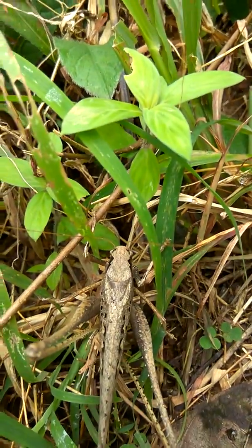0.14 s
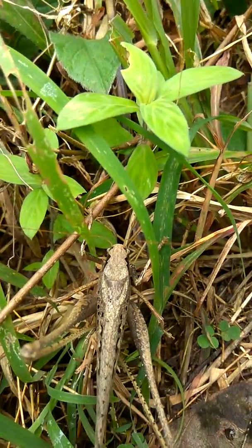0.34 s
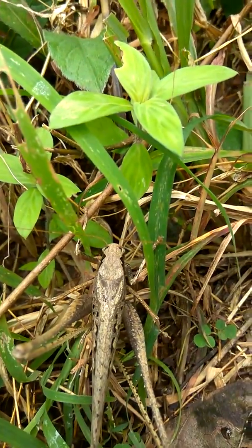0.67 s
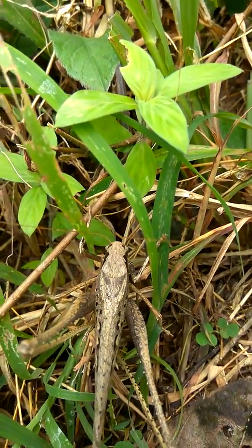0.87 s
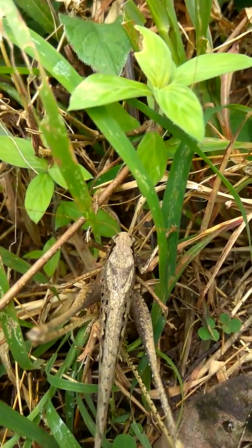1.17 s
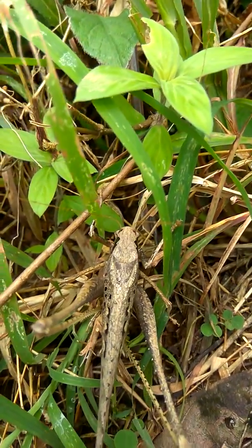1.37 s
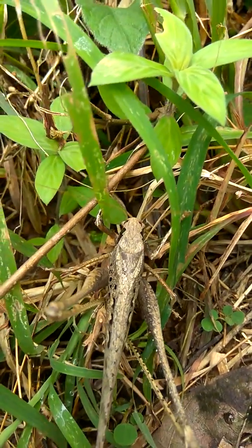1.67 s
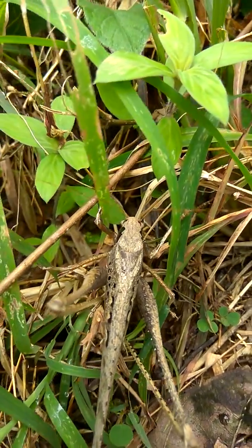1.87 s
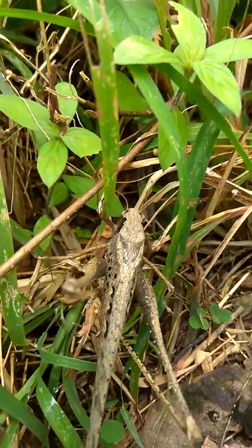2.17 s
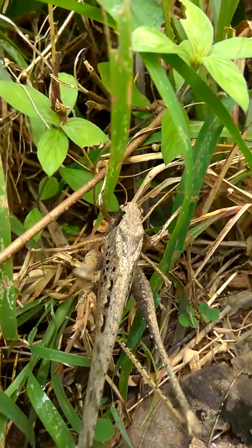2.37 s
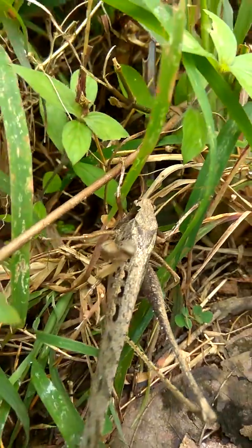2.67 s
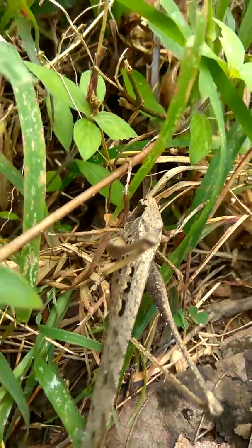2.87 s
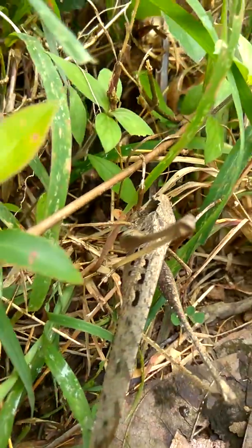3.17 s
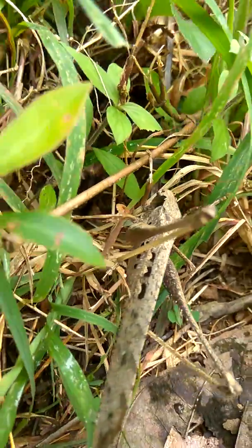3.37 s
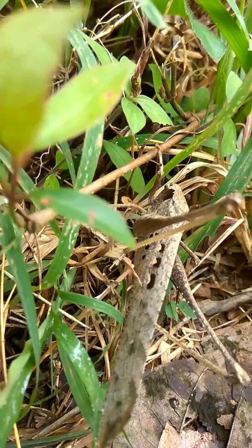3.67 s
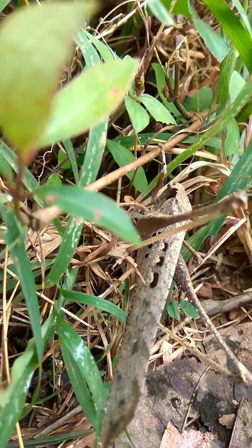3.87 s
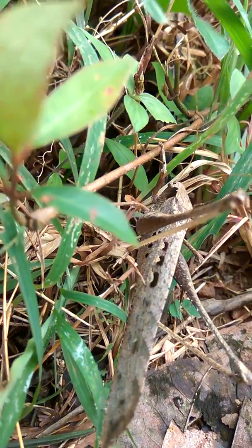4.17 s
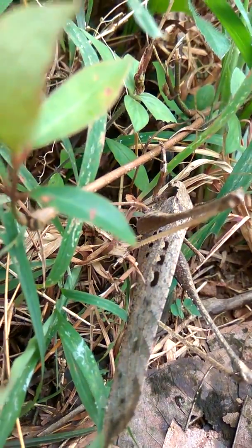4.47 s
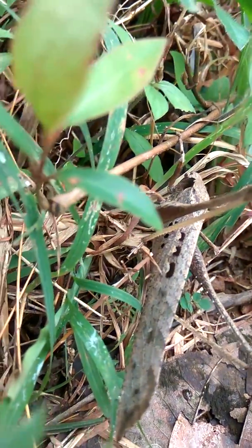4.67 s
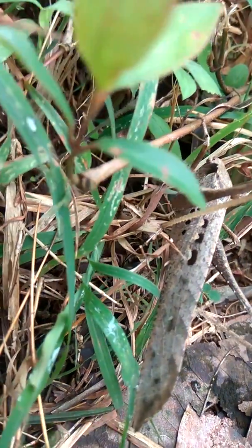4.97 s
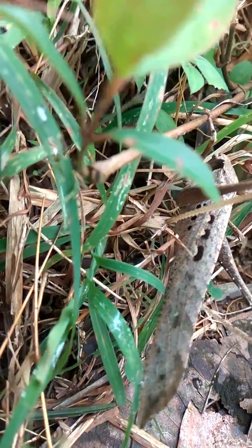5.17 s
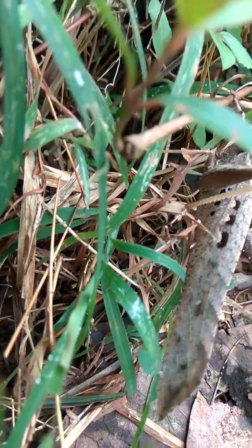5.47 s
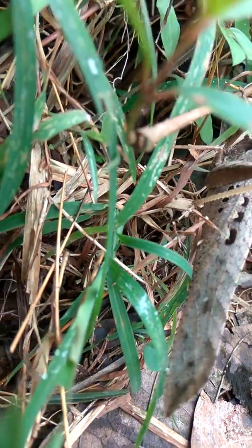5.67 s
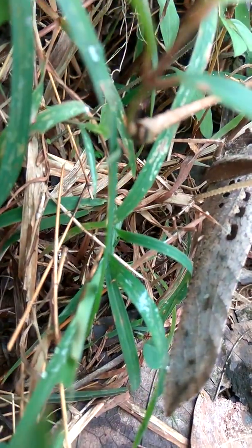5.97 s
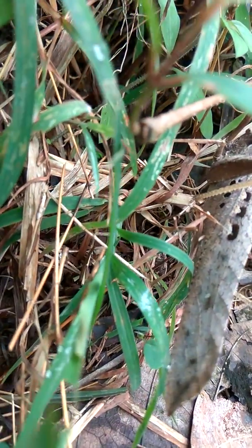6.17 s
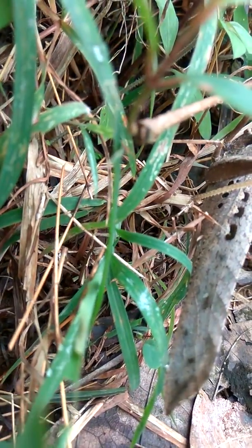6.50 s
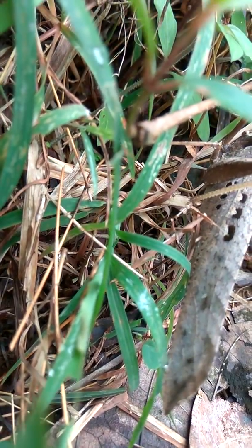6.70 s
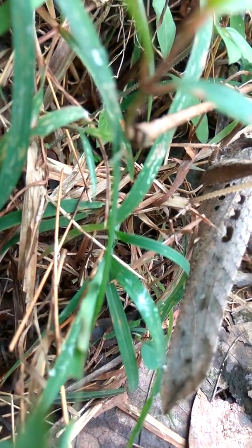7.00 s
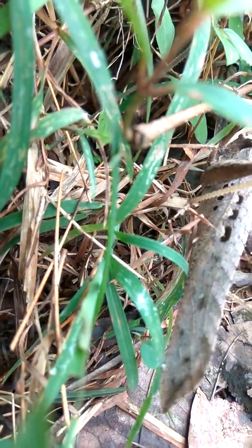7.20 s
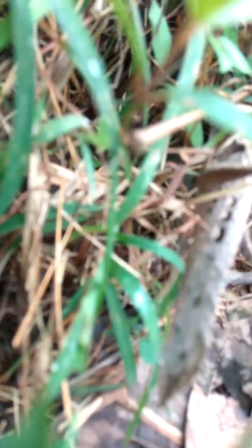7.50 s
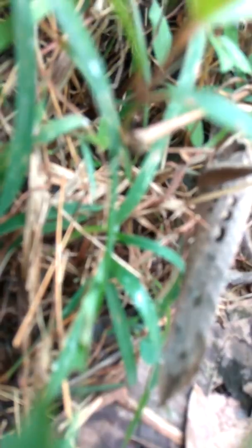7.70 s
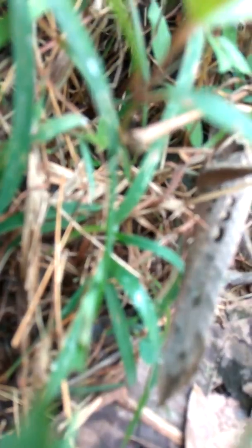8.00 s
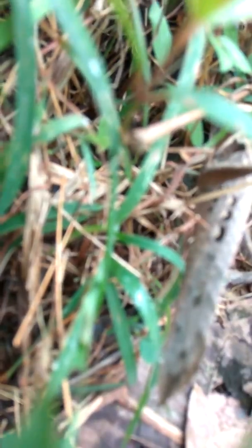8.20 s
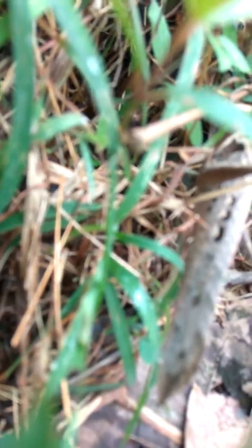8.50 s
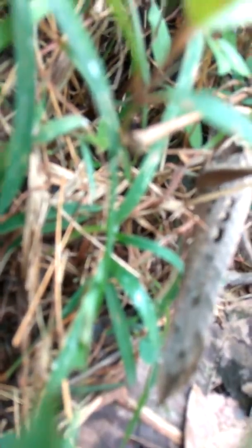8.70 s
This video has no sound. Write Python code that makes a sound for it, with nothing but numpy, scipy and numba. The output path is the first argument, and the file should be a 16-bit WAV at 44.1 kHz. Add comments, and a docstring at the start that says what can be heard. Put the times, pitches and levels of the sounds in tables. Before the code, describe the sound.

A small bird calls repeatedly outdoors over a faint low rumble, then dry grass and leaves scrape, crackle and snap loudly against the left microphone.

```python
"""A small bird is already calling in the bushes, over a low far rumble and faint wavering insect tones.
A few lone snaps follow, and the bird begins a run of falling two-part calls (gliding sines with a noise wash).
A phone is then pushed through dry grass: stalks and dead leaves scrape and snap on its left microphone as
noise bursts ringing resonators; the right one hears softer leaves. The loudest snaps overload the recorder."""
import sys
import numpy as np
from scipy import signal
from scipy.fft import rfft, irfft, next_fast_len
from scipy.io import wavfile
from scipy.ndimage import uniform_filter1d
from numba import njit

SR = 44100
rng = np.random.default_rng(int(sys.argv[2]) if len(sys.argv) > 2 else 0)


def wav_record(signal):
    """Record a signal, one row per channel, as 16-bit PCM in the file named by sys.argv[1]."""
    frames = np.transpose(np.atleast_2d(signal))
    bounded = np.clip(frames, -1, 1)
    # unit amplitude maps onto the largest positive 16-bit level
    quanta = np.round(bounded * 32767).astype(np.int16)
    wavfile.write(sys.argv[1], SR, quanta)


def rack_gain(trim_db):
    """Turn a fader trim in dB into the linear factor to multiply a signal by."""
    fader = np.asarray(trim_db, float)
    return 10 ** (fader / 20)


N = 390285  # length in samples
TIME = np.arange(N) / SR  # s

# All table levels are relative; the functions add their own gains.
# Stalks snapping at the left port:
# (time [s], middle level [dB], body above middle [dB], edge above middle [dB])
NEAR_SNAPS = [(1.1478, -70.5, 18.5, 24), (1.2845, -67.5, 19.5, 30.5), (1.4955, -60.5, 14, 24),
              (1.7629, -51.5, 11, 22), (2.3629, -59.5, 20, 26.5), (2.968, -44, 12.5, -3),
              (3.024, -35, 9.5, 2.5), (3.1203, -32, 9, 0), (3.1867, -37.5, 19, 4.5),
              (3.2385, -41.5, 25.5, 14), (3.2905, -22, 1, -3), (3.3034, -14, -4, 2.5),
              (3.3508, -7.5, -7, -5), (3.3802, -9, -22, 2.5), (3.3902, -13, -14, -13),
              (3.4047, -6, -19, -8.5), (3.4346, -15, -21, -8), (3.475, -27, 1.5, 16.5),
              (3.5075, -18, -19, -4), (3.5279, -14, -7.5, 3), (3.5728, -24.5, -1, 14.5),
              (3.6183, -21, -6, 5), (3.6351, -7, -13, 1), (3.6677, -28, -26, -9), (3.7005, -17, 6, 6.5),
              (3.71, -18, 6, 10.5), (3.7219, -9, -27, -1.5), (3.7299, -15, -6, 3), (3.7435, -14, -4, 0),
              (3.7529, -34, -25, 19), (3.7714, -23.5, -15, 11.5), (3.797, -39, -25, -11),
              (3.8187, -10, -8, -2.5), (3.8245, -14, -6, 3), (3.8945, -36.5, 0, 14.5),
              (3.9195, -20.5, -8, -15), (4.0858, -28.5, -1, -7), (4.1011, -16, -10, -0.5),
              (4.126, -16, -18, -10), (4.147, -17.5, -20, -5), (4.174, -26.5, -2.5, 3),
              (4.2036, -19.5, -13, 1), (4.3146, -31.5, 10, 14.5), (4.328, -27.5, -20, 16),
              (4.3929, -28, -7, 12.5), (4.405, -24, -5, 13.5), (4.4228, -19, -10, 5.5),
              (4.4348, -26.5, -15, 19), (4.5074, -31, -5, 2.5), (4.5695, -24, -12, 9.5),
              (4.645, -26, -9, 4), (4.7147, -15.5, -5, -2), (4.7391, -7.5, -17, -31),
              (4.793, -7.5, -11.5, -36), (4.803, -16, -12, -9), (4.862, -16, -15, -19),
              (4.8808, -7.5, -13, -34), (4.9816, -36, 0, 20.5), (4.9945, -28, 8.5, 14),
              (5.0464, -35.5, 11, 22), (5.0925, -34, -9, 8), (5.1205, -31, -1, 7), (5.1342, -28, 11, 8),
              (5.1692, -32.5, 10, 8), (5.1751, -17.5, 11, 12), (5.2001, -22.5, 4.5, 8.5),
              (5.2515, -21, 3.5, 3), (5.3073, -35, 18.5, 17.5), (5.3527, -20.5, 8.5, 4),
              (5.3752, -23, 6.5, 5.5), (5.3971, -26.5, 2, 10.5), (5.4335, -27.5, -10, 5.5),
              (5.4665, -46, -15, 25.5), (5.4864, -33.5, -2, 11.5), (5.5214, -28, -2, 5),
              (5.5303, -23, -0.5, 5), (5.5405, -29, -8, 3), (5.604, -23, -22, -19), (5.62, -25.5, -1, -13),
              (5.7009, -22, -6, 6.5), (5.7773, -27, -4, 11.5), (5.8296, -33, -2, 13),
              (5.8366, -14.5, -17, -24), (5.8476, -35.5, -10, 19), (5.855, -29.5, -12, 12.5),
              (5.9678, -31.5, 4, 11), (5.9938, -14, -14.5, 4), (6.0691, -20, -12, 2.5),
              (6.129, -16.5, -10, 3), (6.1414, -6.5, -9, -10), (6.1509, -13, -2.5, 0),
              (6.1699, -16, -29, -20), (6.1923, -13.5, -17, -3.5), (6.1993, -14.5, -5, -3),
              (6.2238, -24, 0, -2), (6.2355, -24.5, 2.5, -3), (6.334, -34.5, 8, -11), (6.4971, -21, 2, 2.5),
              (6.728, -34.5, -3, -7), (6.7501, -16.5, -0.5, 1), (6.787, -30, -11, -21),
              (6.8, -33.5, 1, -21), (6.8225, -32, -6, -23), (6.841, -34, -3, -21), (6.855, -29, -4, -14),
              (6.882, -31, -8, -22), (6.9057, -19.5, -1.5, -11.5), (6.929, -44, -8, -17),
              (6.9586, -16, -20, -12), (6.974, -38, 7, -6), (6.997, -28.5, -5, -13), (7.0374, -32, -11, -2),
              (7.1392, -30, 1, -5.5), (7.2454, -34.5, -7, -24), (7.3253, -37, -20, -23),
              (7.3603, -41, -15, -6), (7.3716, -36.5, 0, -13), (7.408, -49, 12.5, -18), (7.447, -41, 1, -7),
              (7.485, -44.5, 6.5, 13), (7.5667, -56, 15, 21), (7.645, -60.5, -17, 28),
              (7.7119, -30.5, -7.5, -45), (7.766, -38.5, 5, -34), (7.8636, -31, -6, -9),
              (7.88, -34, -5.5, -14), (7.8948, -42.5, -11, 12.5), (7.923, -36, -19, -28),
              (7.941, -39, -20, -29), (7.983, -43, 4, 2), (8.0183, -40, -17, -23), (8.0321, -35, 1, -8),
              (8.075, -34, -2, -24), (8.11, -46, 0, -19), (8.1225, -37.5, 0, -25), (8.172, -43, 4, 2),
              (8.2082, -33.5, 4.5, -9), (8.229, -38, 7, -7), (8.2517, -36, -9, 0.5),
              (8.3265, -17, -14, -13), (8.341, -39, -5, -1), (8.3715, -31.5, -4, -4),
              (8.514, -22.5, -4, -14.5), (8.5475, -25.5, 2.5, -25), (8.6413, -16, -42, -28),
              (8.6562, -23.5, -7, -19), (8.6783, -19.5, -26, -15), (8.7007, -25, -23, -10),
              (8.753, -32, 4, -3), (8.8165, -37, -15, -2)]
# Steady drag of grass over the left port: (time [s], crackle level [dB], thud level [dB])
DRAG = [(0.4, -88, -75.5), (1.299, -82, -69), (2.12, -75, -74), (2.65, -55.5, -58), (3.2, -48, -43),
        (3.48, -38, -54), (3.831, -37.5, -56), (3.902, -64.5, -69), (4.05, -54, -74), (4.13, -48.5, -51),
        (4.23, -48.5, -75), (4.55, -39, -76), (5.151, -42, -50), (5.23, -66.5, -66), (5.5, -57.5, -59.5),
        (6.15, -52.5, -67.5), (6.31, -67, -64), (6.68, -59.5, -68), (6.86, -53, -60.5), (7.02, -55.5, -68),
        (7.06, -60.5, -67.5), (7.6, -62, -62), (7.88, -61.5, -79), (8.14, -64.5, -69), (8.6, -56, -59.5),
        (8.798, -71, -67)]
# Short scuffs on top of the drag: (time [s], crackle level [dB])
SCUFFS = [(2.85, -49.5), (2.99, -52), (3.292, -39), (3.411, -34), (3.645, -34), (3.724, -24),
          (4.307, -34.5), (4.428, -38.5), (4.793, -28.5), (4.95, -29), (5.392, -48), (5.63, -45),
          (5.832, -43.5), (6.21, -45.5), (6.388, -49), (6.506, -40.5), (8.34, -49.5), (8.664, -43),
          (8.84, -48.5)]
SCUFF_RISE_DB_S, SCUFF_FALL_DB_S = 279, 253
# Knocks of the housing: (time [s], level [dB])
KNOCKS = [(1.283, -44.5), (1.494, -43.5), (1.76, -42), (2.359, -41.5), (2.529, -44), (2.551, -43.5),
          (2.592, -44), (2.699, -45), (2.728, -35), (2.842, -35.5), (2.864, -40), (2.967, -34),
          (3.024, -36), (3.065, -35), (3.114, -36.5), (3.184, -29.5), (3.238, -32), (3.629, -28),
          (3.72, -29), (5.136, -31), (5.173, -29), (5.394, -35), (5.483, -37), (5.527, -29.5)]
# Air pocket between port and grass:
# (time [s], pitch [Hz], high ring level [dB], crackle brightness [dB], crackle body [dB])
AIR_POCKET = [(2.4, 564, -6.5, 9.5, 6.5), (3.24, 472, 2.5, 0.5, 8.5), (3.6, 1060, -20, 5.5, 5.5),
              (3.85, 960, -12, 3.5, 4.5), (3.97, 940, -31, 1, 7), (4.1, 860, -40, 4, 1),
              (4.95, 1080, -5.5, 2.5, 4), (5.08, 1170, 3.5, -4, 7.5), (5.3, 955, 15.5, 7, 16.5),
              (5.6, 753, -9, 3, 2.5), (6.7, 593, 2.5, -2, 4.5), (7.6, 604, -25, -3.5, 5),
              (8.4, 765, -2, 5.5, 14)]
# Bands in which a snap rings: (low edge [Hz], high edge [Hz])
THUD, BODY, MIDDLE, EDGE = (95, 320), (350, 1300), (1550, 3200), (3300, 6800)

# Snaps heard at the right port:
# (time [s], peak level [dB], body above middle [dB], edge above middle [dB])
FAR_SNAPS = [(1.148, -45.0, -2.0, 4.0), (1.284, -37.0, -4.0, -2.0), (1.497, -33.0, -9.0, 0.0),
             (1.763, -28.0, -8.0, 2.0), (2.363, -38.0, -2.0, -1.0), (3.035, -36.0, -9.0, 5.0),
             (4.401, -35.0, -14.0, 5.0), (6.118, -34.0, -19.0, -2.0), (6.861, -36.0, -7.0, -5.0),
             (7.468, -31.0, -7.0, 15.0), (7.527, -37.0, -12.0, -4.0), (8.662, -23.0, -11.0, -6.0)]
# Leaves heard at the right port: (time [s], level [dB])
FAR_RUSTLE = [(0.0, -79), (0.6, -84), (0.8, -76.5), (1.8, -72), (3.4, -65), (3.8, -67), (4.0, -83),
              (4.2, -74), (4.4, -57.5), (4.8, -61), (5.2, -67.5), (5.8, -61), (6.2, -61), (6.5, -67.5),
              (7.2, -72), (7.6, -69), (8.8, -66)]

# One bird call, a fall and then a held note: (time [s], nominal pitch [Hz], level [dB])
CALL = [(0, 4600, -16), (.012, 4120, -6), (.022, 3760, 3), (.034, 3400, -6), (.047, 3000, 2),
        (.068, 2420, -20), (.085, 2400, -24), (0.1, 2580, -13), (0.116, 2720, -8), (.15, 2720, -15),
        (.23, 2720, -30)]
# Quick upward flick after a call: (time after the call begins [s], nominal pitch [Hz], level [dB])
FLICK = [(.276, 2700, -14), (.284, 3200, -8), (.29, 3900, -1), (.294, 5000, -9), (.298, 5600, -10)]
# One lone call, then a run whose gaps stretch and whose level sinks
LONE_CALL_S, LONE_CALL_DB, LONE_FLICK_LATE_S = -0.046, -58, .02
RUN_START_S, GAP_S, STRETCH_S = 1.745, .409, .0007
RUN_DB, SINK_DB, CALL_SCATTER_DB, FLICK_DB = -56, .4, 1.5, -3

# Spectrum of the far rumble: (frequency [Hz], level [dB])
RUMBLE_SPECTRUM = [(24, -95), (40, -26), (67, -13), (149, -9), (190, -11), (380, -24.5), (1150, -37.5),
                   (4610, -44.5), (11000, -46), (14300, -100), (22000, -120)]
RUMBLE_DB = -64.5  # rms of the part common to both ports, before the swell
# Insect tones: (frequency [Hz], rms level before the port gains [dB])
INSECTS = [(4500, -89.5), (6000, -102.5)]

# Treble roll-off with a dip at 8.2 kHz and a faint band returning near 9.2 kHz: (frequency [Hz], gain [dB])
TREBLE_SHAPE = [(6000, -1), (7000, -7.5), (7600, -14.5), (8200, -21.5), (9200, -9), (10200, -30),
                (16000, -67)]
SPLIT_HZ, SPLIT_WIDTHS_HZ = 4000, (450, 200)
CEILING = .61  # amplitude limit ahead of the output filter
# Output filter after the ceiling: (frequency [Hz], gain [dB])
OUTPUT_FILTER = [(8000, 0.5), (12000, -5), (15600, -6), (16500, -44)]


def snaps(table, middle_db, body_db, edge_db, hollow_db):
    """Impulsive fracture: each breaking stalk excites three bands; the body lasts longest and jolts the housing."""
    s, db, body, edge = np.transpose(table)
    # every stalk gives way twice, the weaker break just before or after
    late, weak, tint = rng.random((len(s), 3)).T
    s = np.append(s, s - 0.003 + 0.012 * late)
    db = np.append(db, db - 3.0 - 17.4 * weak)
    body = np.append(body, body)
    edge = np.append(edge, edge - 2.4 * tint)
    soft = (edge < -5) & (db < -30)  # quiet, dull ones are leaves crumpling, slower than a break

    def envelope(level_db, rise_ms, fall_ms):
        breaking = bursts(s[~soft], level_db[~soft], rise_ms, fall_ms)
        crumpling = bursts(s[soft], level_db[soft] - 4.5, 0.85, fall_ms + 1.47)
        return np.hypot(breaking, crumpling)

    jolt_envelope = bursts(s, db + body + body_db - 14.0, 0.92, 2.1)
    jolt = band(jolt_envelope * rng.standard_normal(N), THUD)
    body_envelope = envelope(db + body + body_db, 0.21, 2.02)
    middle_envelope = envelope(db + middle_db, 0.04, 0.99)
    edge_envelope = envelope(db + edge + edge_db, 0.036, 1.0)
    return jolt + leaf(body_envelope, middle_envelope, edge_envelope, hollow_db)


def scrape():
    """Stick-slip friction: dragged grass crackles in fits, and dull thuds resonate in the housing."""
    s, crackle_db, thud_db = np.transpose(DRAG)
    drag = np.hypot(rack_gain(np.interp(TIME, s, crackle_db)), scuffs(*np.transpose(SCUFFS)))
    pocket_s, _, _, bright_db, body_db = np.transpose(AIR_POCKET)
    low, middle, edge = crackle(count=3400, scatter_db=2.8, tint_db=7.0, smear=0.2, fall_ms=1.8)
    body_envelope = drag * rack_gain(np.interp(TIME, pocket_s, body_db)) * np.hypot(low, 0.75)
    edge_envelope = drag * rack_gain(np.interp(TIME, pocket_s, bright_db)) * edge
    grass = leaf(rack_gain(-6.0) * body_envelope, rack_gain(-0.5) * drag * middle, rack_gain(-1.5) * edge_envelope, hollow_db=3.0)
    fits = rack_gain(1.8 * walk(45))
    thuds = crackle(count=600, scatter_db=-1.0, tint_db=2.5, smear=0.36, fall_ms=8.3)[0]
    thuds = thuds * rack_gain(np.interp(TIME, s, thud_db))
    knocks = np.hypot(thuds, bursts(*np.transpose(KNOCKS), 1.0, 4.5))
    housing_hz = 243.0 * 2 ** (0.36 * walk(5.4))  # the grip shifts
    housing = ring(band(knocks * rng.standard_normal(N), THUD), housing_hz, 270.0)
    return fits * grass + rack_gain(8.0) * housing


def leaf(body, middle, edge, hollow_db):
    """Source-filter principle: one gated breaking noise rings the leaf blades and the air pocket."""
    s, pitch_hz, high_db = np.transpose(AIR_POCKET)[:3]
    hz = np.interp(TIME, s, pitch_hz)
    high_gain = rack_gain(np.interp(TIME, s, high_db))
    noise = rng.standard_normal(N)
    low = band(body * noise, BODY)
    mid = band(middle * noise, MIDDLE)
    high = band(edge * noise, EDGE)
    high_ring = ring(high, 3670.0 * (1 + 0.047 * walk(30)), 670.0)
    pocket = ring(low, hz, 187.0) + high_gain * high_ring
    blade = ring(mid, 2160.0 * 2 ** (0.24 * walk(40)), 440.0)  # each leaf touched rings at its own pitch
    outer = rack_gain(-1.0) * ring(low, 0.72 * hz, 1010.0) + high + rack_gain(hollow_db) * pocket
    return outer - rack_gain(-4.0) * mid - rack_gain(1.5) * blade  # opposite sign: no dip where the parts meet


def crackle(count, scatter_db, tint_db, smear, fall_ms):
    """Crackling noise: random breaks of scattered size, each tinted, as three envelopes of rms 1 over a smear."""
    chance = rng.random((count, 2))
    tint = np.clip(rng.standard_normal((count, 3)).T, -3, 1.6)
    size_db = -scatter_db * np.log(chance[:, 1] + 0.012)  # a positive scatter makes a few much bigger
    times = chance[:, 0] * N / SR
    parts = [bursts(times, size_db + tint_db * each, 0.43, fall_ms) for each in tint]
    return [np.hypot(part / np.sqrt(np.mean(part ** 2)), smear) for part in parts]


def scuffs(s, db):
    """Transient friction: each short rub swells exponentially to db at time s and fades again."""
    coarse = TIME[::64]
    late = coarse - s[:, None]
    shape = db[:, None] - np.where(late > 0, SCUFF_FALL_DB_S, -SCUFF_RISE_DB_S) * late
    return rack_gain(np.interp(TIME, coarse, shape.max(axis=0)))


def far_leaves():
    """Acoustic shadow: on the sheltered side the leaves give softer grains and more smear."""
    level = rack_gain(np.interp(TIME, *np.transpose(FAR_RUSTLE)))
    low, middle, edge = crackle(count=3000, scatter_db=3.2, tint_db=4.0, smear=.6, fall_ms=1.8)
    rustle = leaf(rack_gain(-3.0) * level * low, rack_gain(-8.0) * level * middle, rack_gain(-1.5) * level * edge, -35)
    s, peak_db, body_db, edge_db = np.transpose(FAR_SNAPS)
    middle_db = peak_db - np.maximum(edge_db, 0)  # in a bright snap the edge makes the peak
    table = np.transpose([s, middle_db, body_db, edge_db])
    return rustle + snaps(table, middle_db=-9, body_db=-6, edge_db=-7, hollow_db=-30)


def bird():
    """Multiple scattering: foliage spreads each near-sine call into a wash, unrelated at each port."""
    lead = SR // 10  # room for the call that starts before time zero
    direct = np.zeros(N + 5 * lead)
    k = np.arange(17)
    starts = np.append(LONE_CALL_S, RUN_START_S + GAP_S * k + STRETCH_S * k ** 2)
    bends, scatter = rng.standard_normal((len(starts), 2)).T
    levels = np.append(LONE_CALL_DB, RUN_DB - SINK_DB * k + CALL_SCATTER_DB * scatter[1:])
    # the flick is plain on the first two calls and very faint on the rest
    flick_db = np.where(np.arange(len(starts)) < 2, FLICK_DB, -40)
    for start, call_db, bend, end_db in zip(starts, levels, bends, flick_db):
        at = lead + int(start * SR)
        for shape, db in [(CALL, call_db), (FLICK, call_db + end_db)]:
            note = whistle(shape, 1 + 0.0029 * bend)
            direct[at:at + len(note)] += rack_gain(db) * note
            at += int(LONE_FLICK_LATE_S * SR) * (start < 0)
    t = np.arange(SR) / SR
    decay = rack_gain(-60 * t / .65) * np.clip(t / .02, 0, 1)  # falls 60 dB in 0.65 s
    tail = rng.standard_normal((2, SR)) * decay
    wash = signal.fftconvolve(direct[None], tail / np.sqrt(np.sum(tail[0] ** 2)))
    # the phone turns, and the left port slowly comes round to face the bird
    facing_db = np.array([np.linspace(-10, -4, len(direct)), np.full(len(direct), 3.)])
    heard = rack_gain(facing_db) * direct + rack_gain(2.5) * wash[:, :len(direct)]
    return heard[:, lead:lead + N]


def whistle(shape, bend):
    """Frequency modulation: a sine's phase integrates its pitch along (s, Hz, dB) points."""
    s, hz, db = np.transpose(shape)
    t = np.arange(int(s[-1] * SR)) / SR
    phase = 2 * np.pi * np.cumsum(np.interp(t, s, hz) * bend) / SR
    return rack_gain(np.interp(t, s, db, left=-150)) * np.sin(phase)  # silent before the first point


def air():
    """Spatial coherence: the swelling far rumble is alike at both ports in the bass, apart above; insects overlie it."""
    mid, side = colour(rng.standard_normal((2, N)), RUMBLE_SPECTRUM)
    side = colour(side, [(100, -14.5), (300, -34.5), (800, 0.5)])
    scale = rack_gain(RUMBLE_DB) / mid.std()
    swell = rack_gain(2.2 * walk(2.5) + 1.5 * walk(9))
    out = scale * swell * np.array([mid + side, mid - side])
    port_db = np.array([[-8], [3]])  # insects are stronger on the right
    for hz, db in INSECTS:
        tone = 2 ** .5 * np.sin(2 * np.pi * np.cumsum(hz + 5.8 * walk(38)) / SR)
        out = out + rack_gain(db + 1.9 * walk(7.7) + port_db) * tone
    return out


@njit
def ring(x, hz, width):
    """Damped resonance: a state-variable band-pass with a moving centre, gain 1 there."""
    y, b, l = np.empty(len(x)), 0., 0.  # output, band state, low state
    for i in range(len(x)):
        g, k = np.tan(np.pi * hz[i] / SR), width / hz[i]
        v = (b + g * (x[i] - l)) / (1 + g * (g + k))
        b, l, y[i] = 2 * v - b, l + 2 * g * v, k * v
    return y


def bursts(s, db, rise_ms, fall_ms):
    """Power addition: puffs that jump up at times s to db and decay exponentially sum as energies."""
    train = np.zeros(N)
    np.add.at(train, np.clip((s * SR).astype(int), 0, N - 1), rack_gain(2 * db))
    t = np.arange(SR // 20) / SR
    puff = np.exp(-2e3 * t / fall_ms) * (1 - np.exp(-1e3 * t / rise_ms)) ** 2
    return np.sqrt(np.abs(signal.oaconvolve(train, puff / puff.max())[:N]))


def band(x, edges, order=2):
    """Bandwidth normalisation: a causal band-pass in which white noise of rms 1 keeps rms 1."""
    sos = signal.butter(order, edges, "bandpass", fs=SR, output="sos")
    return signal.sosfilt(sos, x) / np.sqrt(2 * (edges[1] - edges[0]) / SR)


def colour(x, points):
    """Spectral shaping: a zero-phase filter through (Hz, dB) points."""
    hz, db = np.transpose(points)
    size = next_fast_len(N)
    bins_hz = np.arange(size // 2 + 1) * SR / size
    gain = rack_gain(np.interp(np.log(bins_hz + 1), np.log(hz), db))
    return irfft(rfft(x, size) * gain, size)[..., :N]


def walk(rate):
    """Slow random modulation: levels held 1 / rate s and slewed twice; spread near 1."""
    k = int(SR / rate)
    held = np.repeat(rng.standard_normal(N // k + 1), k)
    return 1.74 * uniform_filter1d(uniform_filter1d(held, k), k)[:N]


def scene():
    """Superposition: the near contact sounds reach the left port, softer leaves and snaps the right; bird and
    air reach both."""
    near = snaps(NEAR_SNAPS, middle_db=0.0, body_db=-1.0, edge_db=0.5, hollow_db=4.0) + scrape()
    return np.array([near, far_leaves()]) + bird() + air()


def band_limit(x):
    """A steep low-pass at the top of the band."""
    return signal.sosfilt(signal.butter(12, 16000, fs=SR, output="sos"), x)


def record(dry):
    """Linear response, then saturation: treble roll-off, all-pass ringing at 4 kHz, a ceiling, a last filter."""
    x = colour(dry, TREBLE_SHAPE)
    for width in SPLIT_WIDTHS_HZ:  # a band split delays and rings the sound about its centre
        r = np.exp(-np.pi * width / SR)
        poles = np.array([1, -2 * r * np.cos(2 * np.pi * SPLIT_HZ / SR), r * r])
        x = signal.lfilter(poles[::-1], poles, x)
    limited = x / (1 + (np.abs(x) / CEILING) ** 8) ** (1 / 8)
    mix = colour(limited, OUTPUT_FILTER)
    return band_limit(mix)


dry = scene()
out = record(dry)
wav_record(out)
```